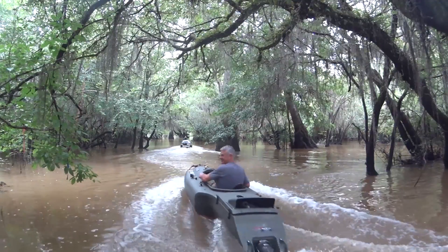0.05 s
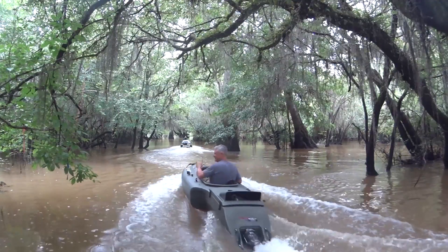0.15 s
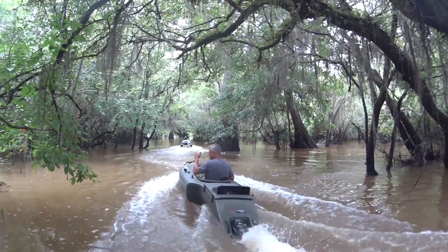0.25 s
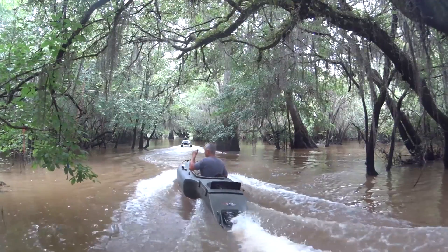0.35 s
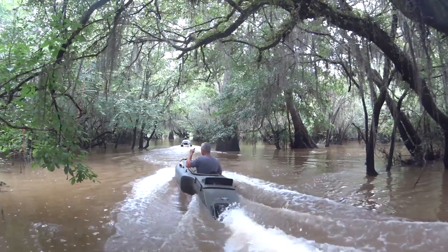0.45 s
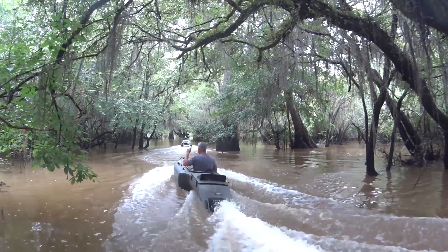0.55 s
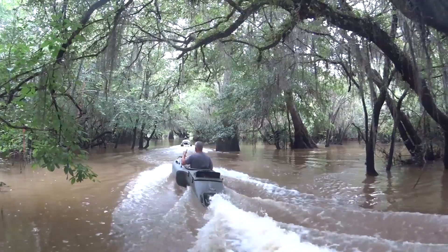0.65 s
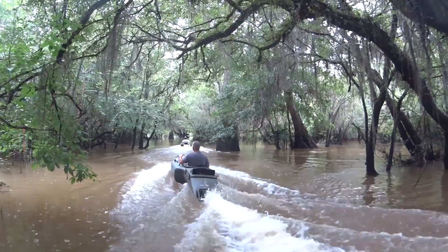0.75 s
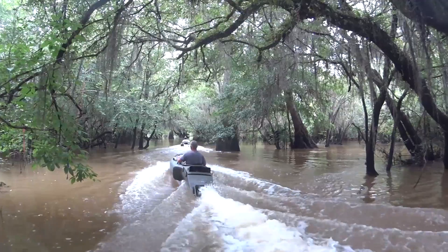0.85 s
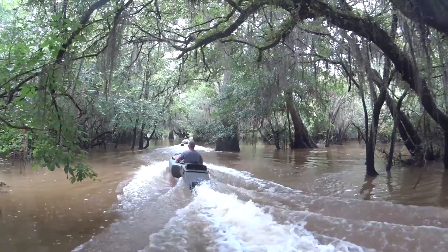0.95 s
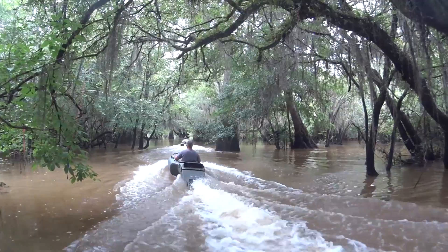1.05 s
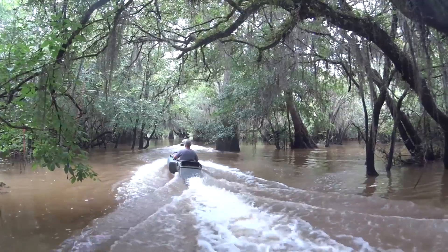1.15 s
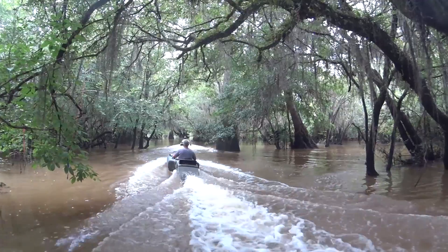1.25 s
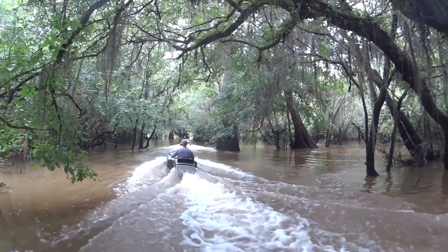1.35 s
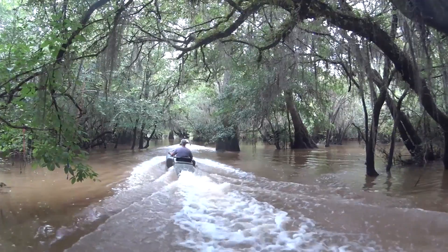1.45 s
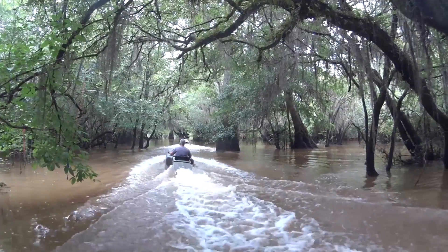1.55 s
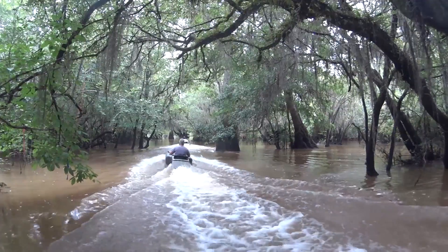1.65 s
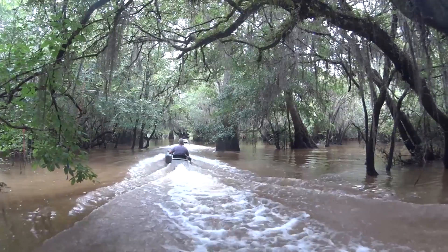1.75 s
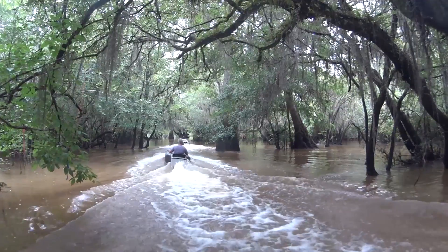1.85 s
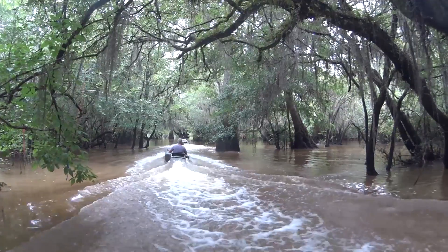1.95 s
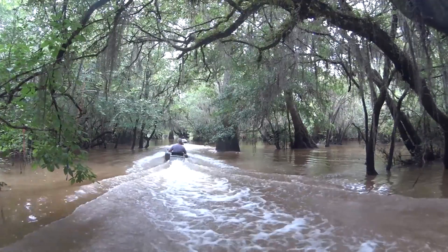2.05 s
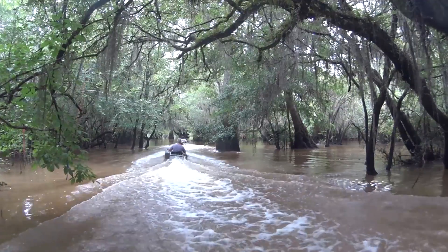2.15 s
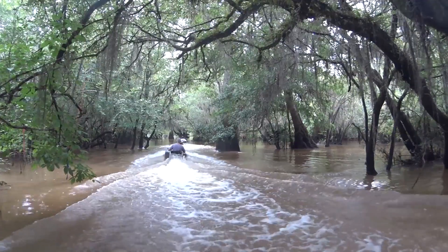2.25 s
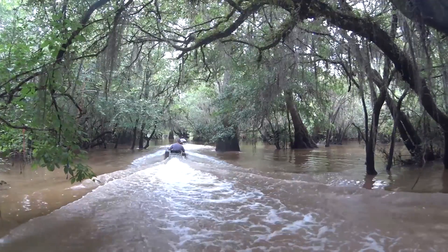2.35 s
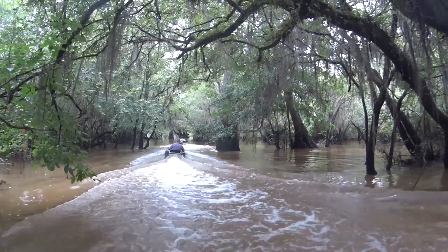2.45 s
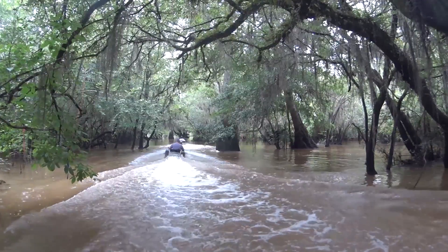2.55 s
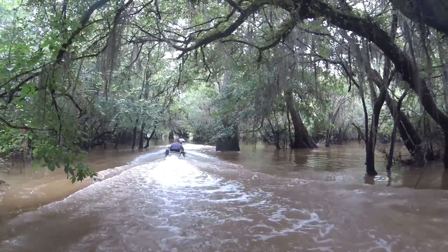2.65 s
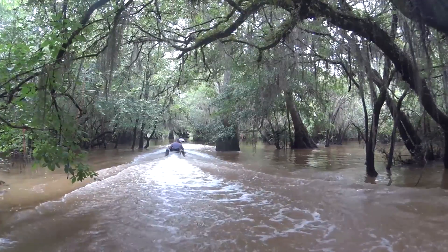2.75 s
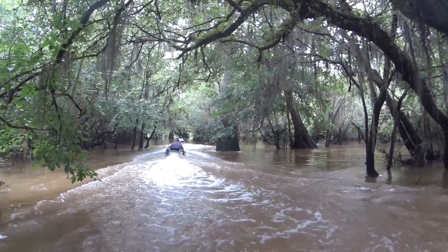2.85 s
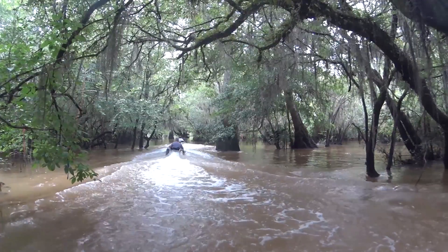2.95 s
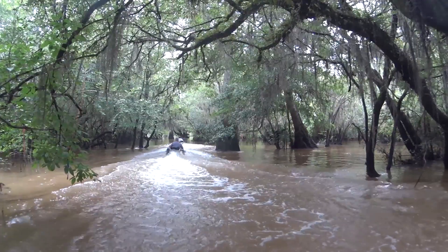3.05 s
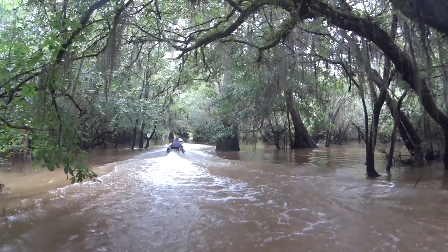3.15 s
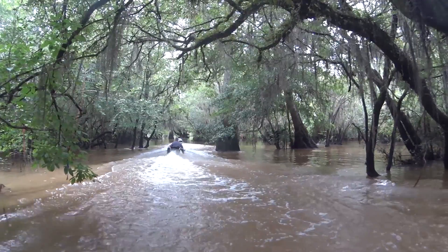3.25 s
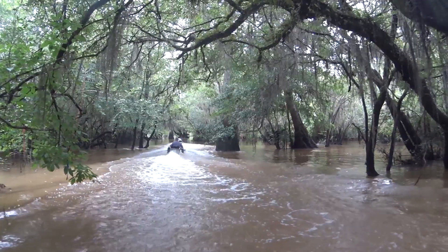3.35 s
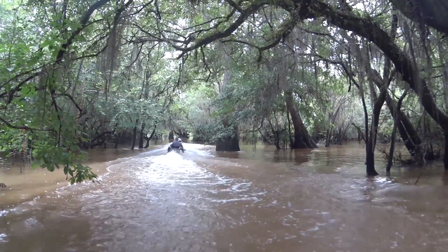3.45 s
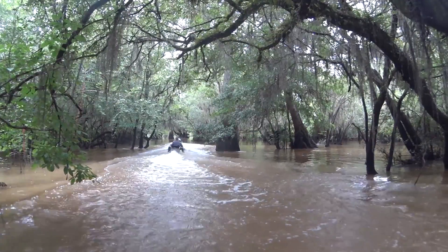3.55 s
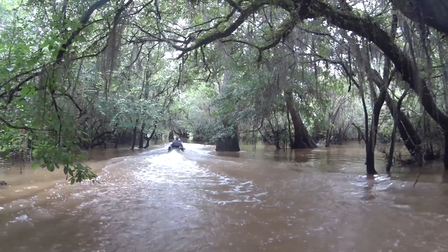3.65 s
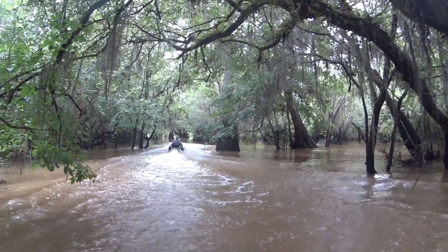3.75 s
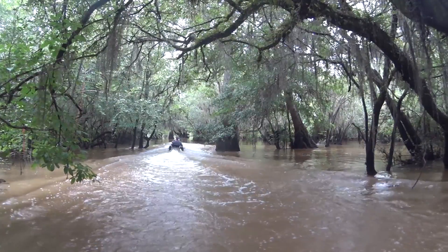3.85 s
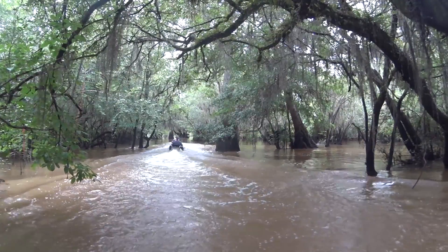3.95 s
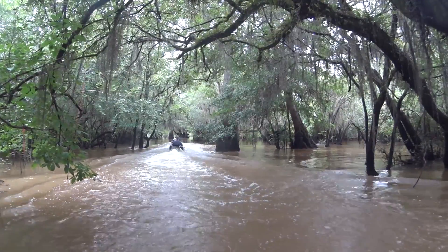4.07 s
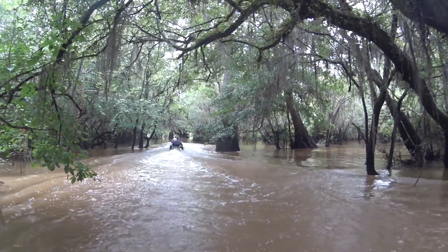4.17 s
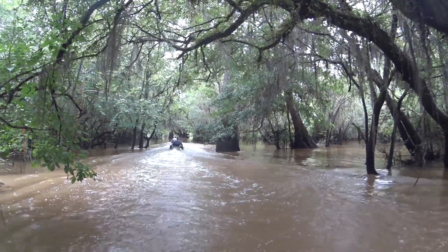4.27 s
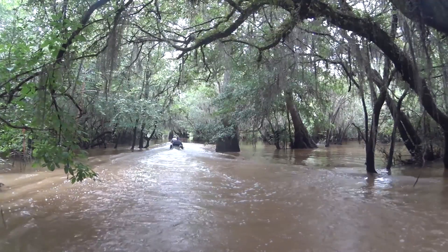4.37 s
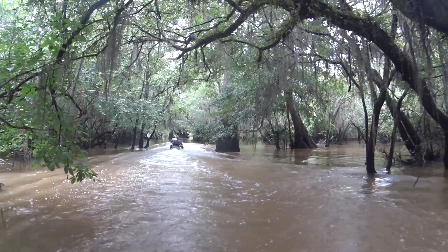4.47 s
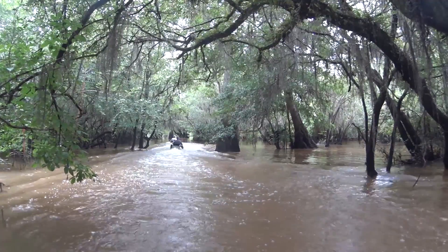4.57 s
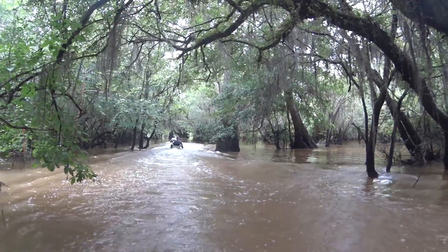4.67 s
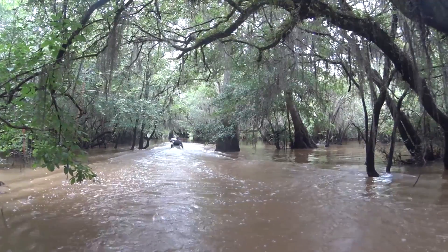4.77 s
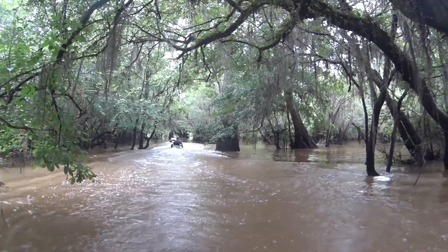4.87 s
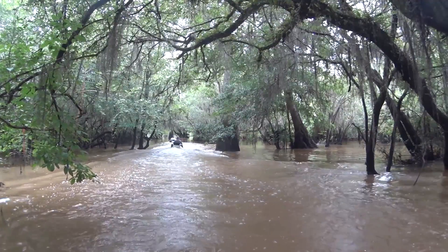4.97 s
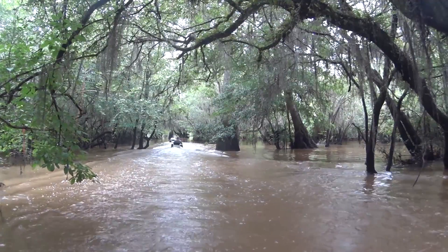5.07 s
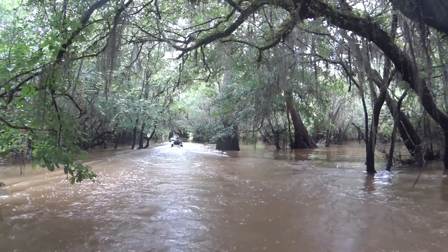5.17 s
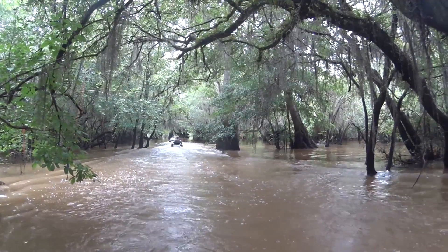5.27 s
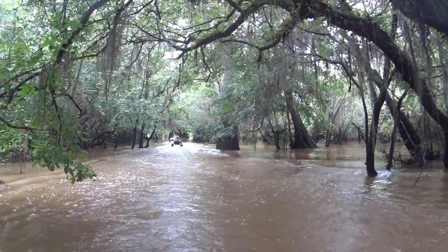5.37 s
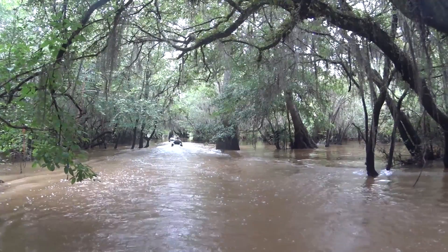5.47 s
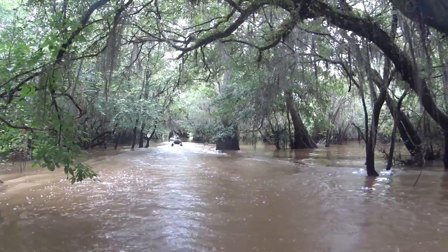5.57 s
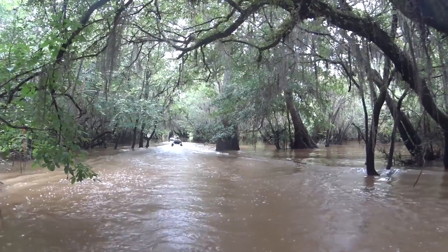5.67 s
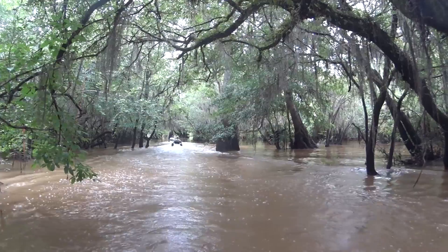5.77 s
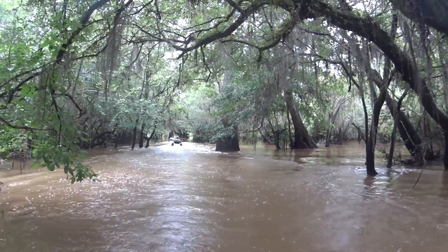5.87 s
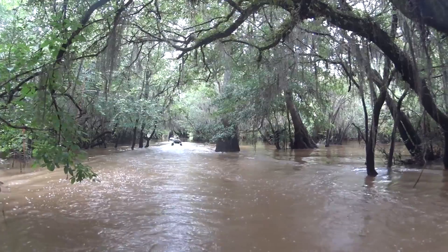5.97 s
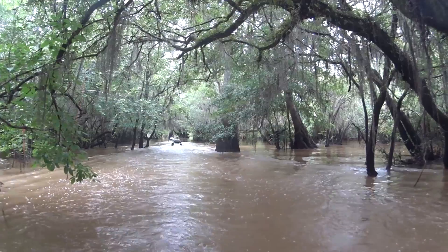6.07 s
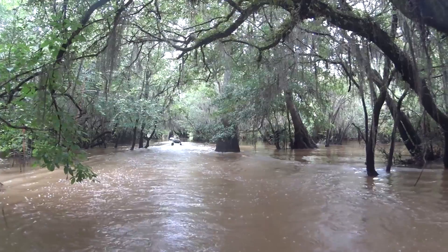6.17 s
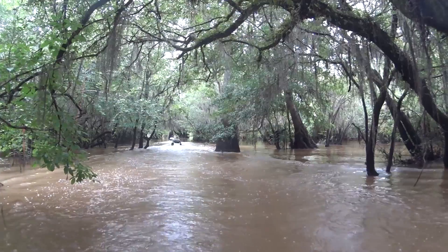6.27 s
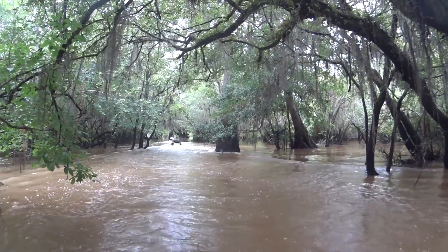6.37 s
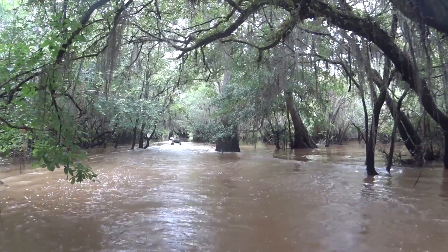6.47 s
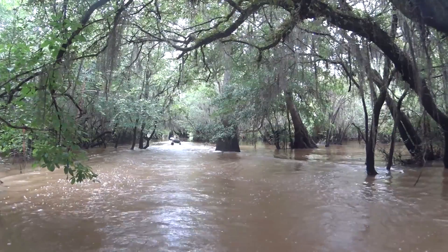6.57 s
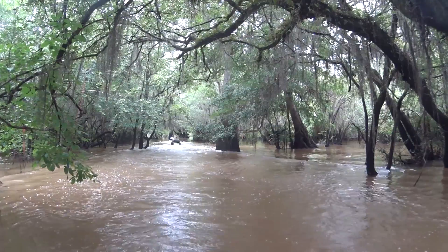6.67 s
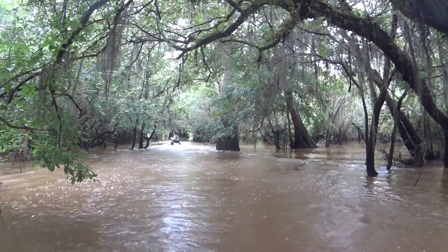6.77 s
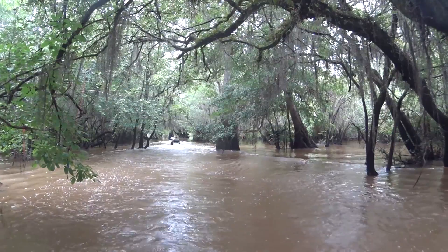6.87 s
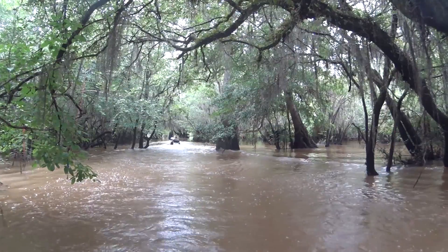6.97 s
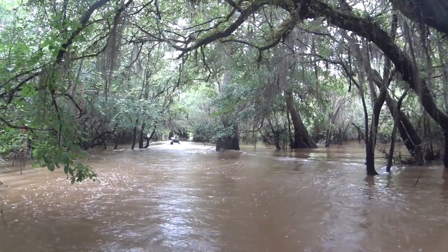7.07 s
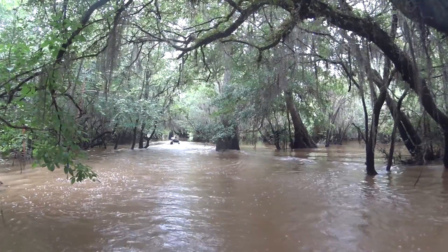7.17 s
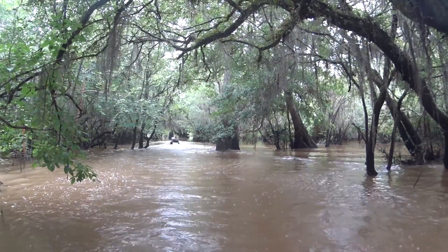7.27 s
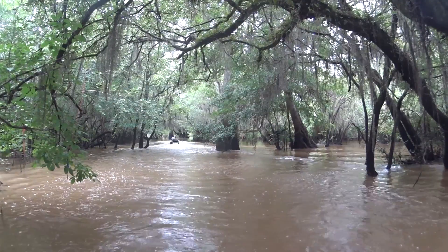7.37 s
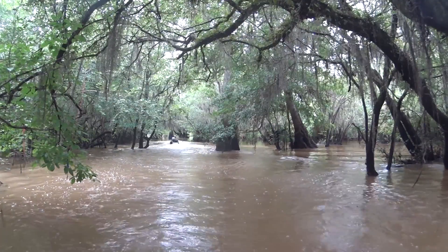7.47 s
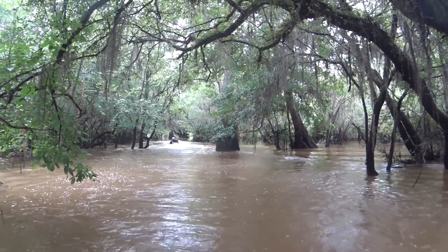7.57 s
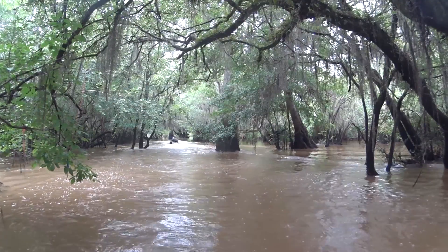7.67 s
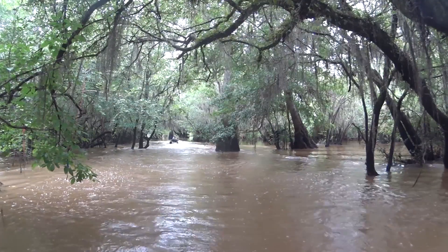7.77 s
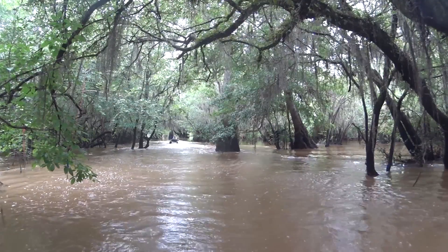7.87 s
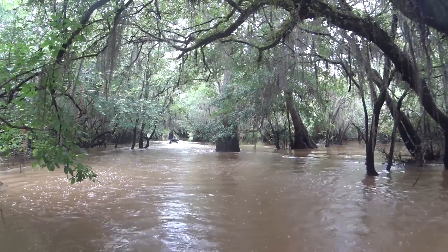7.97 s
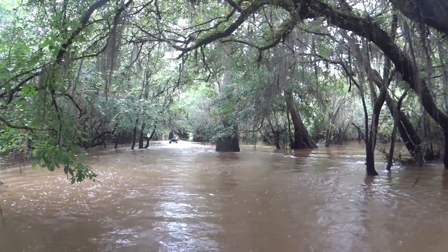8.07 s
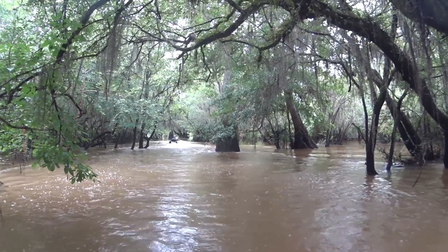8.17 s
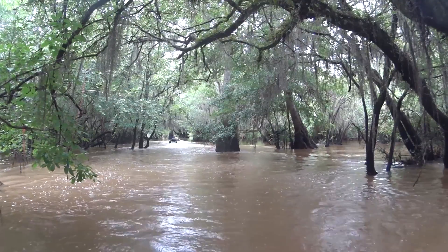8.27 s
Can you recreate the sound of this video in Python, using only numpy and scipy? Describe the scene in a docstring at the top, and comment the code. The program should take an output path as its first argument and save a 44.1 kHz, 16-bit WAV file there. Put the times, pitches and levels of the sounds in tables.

```python
"""A one-cylinder four-stroke jet drive pushes a kayak away from a camera on a flooded forest channel.
Each cycle has an intake honk, an exhaust thud and a clack: pulses and noise bursts ringing resonances.
The throttle eases after three seconds; engine and wake fade with distance and the trees echo the engine.
Shaped noise and droplets make spray that gives way to fizzing foam, a low wash and small splashes.
The camera housing rings near 1.25 kHz, and an insect ticks thinly behind it all."""
import sys
import numpy as np
from scipy import signal
from scipy.fft import rfft, irfft
from scipy.io import wavfile
from scipy.ndimage import uniform_filter1d

SR = 44100
rng = np.random.default_rng(int(sys.argv[2]) if len(sys.argv) > 2 else 0)


def wav_out(sig):
    """Save sig, one row per channel (or a flat mono array), as 16-bit PCM at SR to the path in sys.argv[1]."""
    wavfile.write(sys.argv[1], SR, np.round(np.clip(np.atleast_2d(sig).T, -1, 1) * 32767).astype(np.int16))


N = 366912
TIME = np.arange(N) / SR
FREQS = np.maximum(np.arange(N // 2 + 1) * SR / N, 1)

# clack: level under load, change alongside, and a light tapping that stays at any load and distance
CLACK_DB, CLACK_ALONGSIDE_DB, TAPPING_DB = -18, -11.5, -50.5
# forest echo of a boat ECHO_AT_M away, and its gain on the direct sound per doubling of distance
ECHO_AT_M = 10
DRONE_ECHO_DB, CLACK_ECHO_DB, ECHO_GROWTH_DB = -8, -5, 2
# engine speed, full and then throttled back: t/s, firing rate f/Hz
SPEED = [(0.0, 27.137), (1.2, 28.061), (1.75, 27.703), (2.95, 27.704), (3.25, 26.559), (3.6, 23.346),
         (3.95, 22.197), (5.3, 21.875), (6.6, 22.089), (7.3, 21.548), (8.3, 21.318)]


def engine(metres, load, alongside):
    """Intake, exhaust and clack follow each other within every two turns of a slightly wavering crank."""
    firing_hz = curves(SPEED)[0]
    cycles = .33 + np.cumsum(firing_hz) / SR + .003 * walk(6)
    hum = drone(cycles, load, alongside) * amp(fade(metres, reach_m=31, doubling_db=-12))
    knock_db = CLACK_DB + CLACK_ALONGSIDE_DB * alongside
    knock_db = knock_db + fade(metres, reach_m=15.85, doubling_db=-24.5)
    rattle = clack(cycles, alongside) * (load ** 2 * amp(knock_db) + amp(TAPPING_DB))
    # more of the far boat arrives by way of the trees
    scattered = hum * amp(DRONE_ECHO_DB) + rattle.mean(0) * amp(CLACK_ECHO_DB)
    echo_send = scattered * amp(ECHO_GROWTH_DB * np.log2(metres / ECHO_AT_M))
    return hum + rattle + forest(echo_send, t60=0.7, side_db=-3)


# air box and exhaust before distance: level under load, change with the throttle closed,
# change while the boat is alongside
INTAKE_DB, INTAKE_EASED_DB, INTAKE_ALONGSIDE_DB = -31.5, -17, -3
EXHAUST_DB, EXHAUST_EASED_DB, EXHAUST_ALONGSIDE_DB = -35, -7, 0.1
# air box resonances, under load and eased off: f/Hz, width of one pass/Hz, relative level/dB
AIR_BOX_LOADED = [(425.4, 53, -2.5), (342, 11, -11.5), (464, 270, -16)]
AIR_BOX_EASED = [(381.5, 70, -3), (486, 80, -19)]
# exhaust resonances, under load and eased off: f/Hz, width of one pass/Hz, relative level/dB
PIPE_LOADED = [(51, 31, 1.5), (91.7, 14, 1), (113.8, 17, -1), (140, 28, -2), (169.7, 49, 3),
               (223.3, 18, -0.5), (251.1, 34, -2.5)]
PIPE_EASED = [(64, 13, -13), (85, 9.8, 1.5), (104, 23, 4.5), (144, 60, 1.5), (246.8, 37, 0), (618, 30, 2),
              (979, 62, -1), (1072, 34, 2)]
# single engine harmonics swell as paths between the banks add up:
# t/s, length/s, harmonic number, peak level before distance/dB
SWELLS = [(3.225, 0.28, 15, -38.5), (4.046, .32, 6, -42), (4.55, 0.4, 4, -43), (5.4, .6, 6, -46),
          (6.1, 0.36, 6, -49), (6.55, 1, 11, -43.5), (7.35, .48, 4, -45)]


def drone(cycles, load, alongside):
    """Air box and exhaust pipe, each struck once a cycle; both change their voice with the throttle."""
    intake_db = INTAKE_DB + INTAKE_EASED_DB * (1 - load) + INTAKE_ALONGSIDE_DB * alongside
    exhaust_db = EXHAUST_DB + EXHAUST_EASED_DB * (1 - load ** 4) + EXHAUST_ALONGSIDE_DB * alongside
    gulps = strokes(cycles, at=.52, scatter_db=1.2, jitter_s=.00005)
    puffs = strokes(cycles, at=.76, scatter_db=1.1, jitter_s=.0001)
    # the loaded honk gives way to the eased voice as the throttle closes, outlasting the boom
    honk = load ** 3
    # the deep boom carries mostly astern
    boom = load ** 6 * (1 - .5 * alongside)
    intake = honk * ring(gulps, AIR_BOX_LOADED, order=2) + (1 - honk) * ring(gulps, AIR_BOX_EASED, order=2)
    exhaust = boom * ring(puffs, PIPE_LOADED, order=2) + (1 - boom) * ring(puffs, PIPE_EASED, order=2)
    out = intake * amp(intake_db) + exhaust * amp(exhaust_db)
    for s, length, harmonic, db in SWELLS:
        tone = np.cos(2 * np.pi * harmonic * (cycles - .72))
        out = out + amp(db) * swell(s, length) * tone
    return out


# modes that the clack rings: f/Hz, width of one pass/Hz,
# level from astern before weighting by root width/dB, level change alongside/dB
CLACK = [(1440, 490, -4, -10), (1720, 680, -5.5, 8), (2680, 800, 2, -6), (3156, 730, -1.5, -6),
         (4240, 880, 1.5, 4.5), (5630, 590, -4, -21), (8200, 1100, -12.5, 5)]


def clack(cycles, alongside):
    """Each firing rattles the block for a few milliseconds, every time in another mix of modes."""
    firings = strokes(cycles, at=.875, scatter_db=.7, jitter_s=.0004)
    rattle = bursts(firings, rise_s=0.0011, decay_s=0.0042) * noise(side_db=-15)
    out = 0
    for hz, width, db, alongside_db in CLACK:
        strength_db = db + alongside * alongside_db + 1.8 * walk(40)
        mode = ring(rattle, [(hz, width, 0)], order=2)
        out = out + mode * np.sqrt(width) * amp(strength_db)
    return unit(out)


def forest(x, t60, side_db):
    """Diffuse echo from the trunks along both banks: a dying noise tail smears the sound."""
    tail = (noise(side_db) * burst(TIME, 0.0041, t60 / np.log(1000)))[:, :SR]
    tail = tail / np.sqrt(np.sum(tail ** 2) / 2)
    return signal.fftconvolve(x[None], tail, axes=1)[:, :N]


# hiss of the wake from close by; the hull's stern is past at STERN_M
WAKE_DB, STERN_M = -22, 5.6
# gush relative to the hiss, its change with the throttle closed and until the stern is past
GUSH_DB, GUSH_EASED_DB, GUSH_STERN_DB = -8, -5, 1.5
# housing ring relative to the hiss, its change until the stern is past, its level from ripples alone
HOUSING_DB, HOUSING_STERN_DB, RIPPLES_DB = -8.5, 3.2, -46
# fizz of the passing waves relative to their housing ring
WAVE_FIZZ_DB = -2.5
# spray behind the jet: f/Hz, relative level/dB
SPRAY = [(1120, -50), (1900, -27.5), (2080, -6.5), (2460, 2.5), (2740, 2), (3650, -1), (4490, 2.5),
         (5510, -1), (5980, 0), (7400, -8.5), (8260, -9), (9150, -15), (10100, -8.5), (11000, -18),
         (14300, -103), (22000, -120)]
# foam that the jet leaves: f/Hz, relative level/dB
FOAM = [(1120, -23.5), (1900, -13.5), (2200, -6), (2510, 0.5), (3650, -3.5), (4330, 0.5), (4830, 1.5),
        (6020, -3), (7560, -7.5), (8260, -7.5), (9290, -16.5), (10100, -12.5), (11000, -21.5),
        (14300, -100), (22000, -120)]
# water churned by the hull: f/Hz, relative level/dB
GUSH = [(20, -36), (50, -16), (150, -9.5), (300, -13), (550, -8), (820, -17.5), (1050, -7.5), (1400, -0.5),
        (1750, 5), (2050, -7.5), (2600, -6.5), (5000, -54)]
# camera housing resonances: f/Hz, width of one pass/Hz, relative level/dB
HOUSING = [(1216.5, 94, 4.5), (1281, 235, 8)]
# waves of the wake that wash by, fizzing and ringing the housing: t/s, length/s, housing level/dB
WAVES = [(4.6, 0.79, -44), (6.272, 0.36, -45), (7.002, 0.24, -42), (7.99, 1, -43)]


def water(metres, load, alongside):
    """Spray rains back behind the jet; as the throttle eases, bursting foam takes over."""
    wake_db = WAKE_DB + fade(metres, reach_m=15.86, doubling_db=-12.6)
    stern = within(metres, STERN_M, steepness=32)
    waves = sum(amp(db) * swell(s, length) for s, length, db in WAVES)

    fizz = noise(side_db=-9) * amp(1.2 * walk(45))
    fizz = fizz + amp(-5) * drops(rate=3200, scatter_db=3.5, side_db=-12)
    spray = np.sqrt(load) * colour(fizz, SPRAY) * amp(wake_db + 0.5)

    # the nozzle sizzles brightest while the boat is alongside
    hiss = noise(side_db=-6.5) * amp(2 * walk(40))
    sizzle = alongside * ring(hiss, [(5055, 866, 0)], order=2) * amp(wake_db - 6.5)

    bubbles = noise(side_db=-12) * amp(0.6 * walk(25))
    bubbles = bubbles + amp(-3.5) * drops(rate=1400, scatter_db=2.8, side_db=-9)
    foam_gain = np.hypot(np.sqrt(1 - load) * amp(wake_db + 0.64), waves * amp(WAVE_FIZZ_DB))
    foam = colour(bubbles, FOAM) * foam_gain

    churn = noise(side_db=-16) * amp(1.2 * walk(25.18))
    churn = churn + amp(-3.5) * drops(rate=400, scatter_db=1.5, side_db=-17.0)
    gush_db = wake_db + GUSH_DB + GUSH_EASED_DB * (1 - load) + GUSH_STERN_DB * stern
    gush = colour(churn, GUSH) * amp(gush_db)

    # the rush of water keeps the camera housing ringing
    rush = amp(wake_db + HOUSING_DB + HOUSING_STERN_DB * stern)
    drive = np.sqrt(rush ** 2 + amp(RIPPLES_DB) ** 2 + waves ** 2)
    housing = ring(noise(side_db=-11.5) * amp(0.9 * walk(14)), HOUSING, order=2) * drive
    return spray + sizzle + foam + gush + housing


# settling river: f/Hz, relative level/dB
RIVER = [(20, -28), (40, -10), (65, -3.5), (130, -5), (300, -5.5), (400, -3), (600, -3.5), (800, -3),
         (1050, -2), (1500, -18), (2000, -15), (5000, -52)]
# the wake slaps trunks and banks: t/s, level before the burst envelope/dB, centre f/Hz,
# width of one pass/Hz, decay/s
SPLASHES = [(4.908, -30.5, 2200, 1200, 0.022), (5.127, -20.5, 1320, 300, 0.0092),
            (6.99, -32.5, 2300, 2600, 0.025), (7.185, -35, 3200, 2000, 0.029)]


def river(metres, alongside):
    """Low wash that settles as the boat leaves, with the wake slapping here and there."""
    lapping_db = 1.2 * walk(12)
    wash_db = -37 + fade(metres, reach_m=22.7, doubling_db=-11.5) - 8 * alongside
    out = colour(noise(side_db=-15), RIVER) * amp(wash_db + lapping_db)
    for s, db, hz, width, decay in SPLASHES:
        slap = ring(drops(rate=1400, scatter_db=4.0, side_db=-19), [(hz, width, 0)], order=2)
        out = out + amp(db) * burst(TIME - s, 0.0051, decay) * slap
    return out


# insect coming and going: t/s, level/dB
INSECT = [(0, -80), (5.3, -70), (5.9, -53), (6.8, -56), (7.4, -61), (8.3, -55)]


def insect():
    """Thin uneven ticks from the branches: millisecond noise bursts through one high resonance."""
    beats = np.cumsum(15 * amp(2.5 * walk(9))) / SR
    ticks = bursts(strokes(beats, at=0, scatter_db=2.5, jitter_s=.008), rise_s=.001, decay_s=.004)
    return ring(ticks * noise(side_db=-9.0), [(8120, 750, 0)], order=2) * amp(curves(INSECT)[0])


def amp(db):
    """Decibels to gain."""
    return 10 ** (np.asarray(db) / 20)


def unit(x):
    """Scale to rms 1."""
    return x / np.sqrt(np.mean(x ** 2))


def curves(table):
    """Each column of a table as a line through time."""
    s, *columns = np.transpose(table)
    return [np.interp(TIME, s, c) for c in columns]


def spectra(table):
    """Each column of a table as a line over log frequency."""
    hz, *columns = np.transpose(table)
    return [np.interp(np.log(FREQS), np.log(np.maximum(hz, 1)), c) for c in columns]


def colour(x, points):
    """Give a sound the spectrum of (f/Hz, level/dB) points; rms 1."""
    return unit(irfft(rfft(x) * amp(spectra(points)[0]), N))


def ring(x, modes, order=1):
    """Pass a sound through (f/Hz, width/Hz, level/dB) resonances, steeper with each order; rms 1."""
    response = 0
    for hz, width, db in modes:
        detuning = (FREQS ** 2 - hz ** 2) / (FREQS * width)
        response = response + amp(db) / (1 + 1j * detuning) ** order
    return unit(irfft(rfft(x) * response, N))


def walk(rate):
    """Random levels held 1 / rate s and slewed twice; rms 1."""
    k = int(SR / rate)
    steps = np.repeat(rng.standard_normal(N // k + 1), k)
    return unit(uniform_filter1d(uniform_filter1d(steps, k), k)[:N])


def wide(mid, side, side_db):
    """Left and right from a common sound and a weaker unrelated one."""
    return mid + amp(side_db) * side * np.array([[1], [-1]])


def noise(side_db):
    """Stereo noise from a spread-out source."""
    return unit(wide(*rng.standard_normal((2, N)), side_db))


def drops(rate, scatter_db, side_db):
    """Sparse impacts of scattered size, each from its own direction."""
    hit = rng.random(N) < rate / SR
    size_db = scatter_db * np.minimum(rng.exponential(size=N), 3.3)
    size = hit * rng.choice([-1, 1], N) * amp(size_db)
    return unit(wide(size, size * rng.standard_normal(N), side_db))


def strokes(cycles, at, scatter_db, jitter_s):
    """One pulse per cycle at the given part of it, uneven in size and moment."""
    starts = np.flatnonzero(np.diff(np.floor(cycles - at)))
    chance = rng.standard_normal((N // 1000, 2))[:len(starts)]
    moments = starts + (jitter_s * SR * chance[:, 0]).astype(int)
    pulses = np.zeros(N)
    pulses[np.clip(moments, 0, N - 1)] = amp(scatter_db * chance[:, 1])
    return pulses


def burst(age, rise_s, decay_s):
    """Envelope that swells and dies away."""
    age = np.maximum(age, 0)
    return (1 - np.exp(-age / rise_s)) * np.exp(-age / decay_s)


def bursts(pulses, rise_s, decay_s):
    """A short envelope after every pulse."""
    return signal.fftconvolve(pulses, burst(TIME[:SR // 10], rise_s, decay_s))[:N]


def swell(s, length):
    """Smooth rise and fall around a moment; down to 1/e half a length either side."""
    return np.exp(-(2 * (TIME - s) / length) ** 2)


def fade(metres, reach_m, doubling_db):
    """Change in dB with distance: level well within reach, bending to a steady fall per doubling."""
    return doubling_db * np.log2(np.hypot(metres / reach_m, 1))


def within(metres, edge_m, steepness):
    """Near 1 while the boat is closer than the edge, near 0 once it is well beyond."""
    return 1 / (1 + (metres / edge_m) ** steepness)


# the boat's run: distance at the start, and the way it makes with every firing
START_M, METRES_PER_FIRING = 3, .2


def distance():
    """Metres to the boat, which moves as fast as its engine turns."""
    return START_M + METRES_PER_FIRING * np.cumsum(curves(SPEED)[0]) / SR


# beyond this distance the boat is heard from astern
ASTERN_M = 7.1
# the throttle is eased, then nearly closed: t/s, engine load (0-1)
LOAD = [(2.95, 0.95), (3.35, 0.79), (3.46, 0.23), (8.3, 0.01)]


def scene():
    """Boat, wake and forest together, driven by the boat's distance and its throttle."""
    metres, load = distance(), np.clip(curves(LOAD)[0], 0, 1)
    alongside = within(metres, ASTERN_M, steepness=5.5)
    boat = engine(metres, load, alongside) + water(metres, load, alongside)
    return boat + river(metres, alongside) + insect()


TOP_HZ = 11150
# the two microphone ports: f/Hz, left minus right level/dB, phase by which left leads/rad
PORTS = [(40, 2, -.3), (130, -2.3, -.9), (260, -3.5, -1.45), (443, -6, -1.83), (700, -7, -1.66),
         (1250, -5.1, -1.25), (1650, -1.5, -.85), (2100, 1.8, -1.1), (2600, .3, -1.25), (3600, -.5, -.72),
         (5500, -.7, -.57), (8000, 0, -.8), (11000, -.5, .38)]


def record(dry):
    """The ports differ in level and phase while their sum stays flat; deep bass and top are cut."""
    balance_db, lead = spectra(PORTS)
    # each port takes half of the difference
    ports = (amp(balance_db) * np.exp(1j * lead)) ** np.array([[.5], [-.5]])
    low_cut = 1 / np.sqrt(1 + (34 / FREQS) ** 4)
    heard = irfft(rfft(dry) * low_cut * ports / ports.mean(0), N)
    top_cut = signal.ellip(12, .2, 80, TOP_HZ, fs=SR, output="sos")
    return signal.sosfilt(top_cut, heard)


dry = scene()
out = record(dry)
wav_out(out)
```